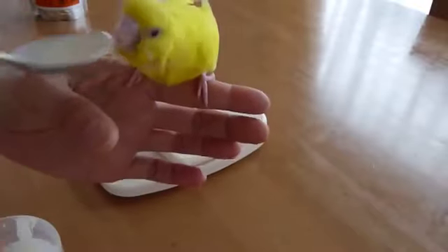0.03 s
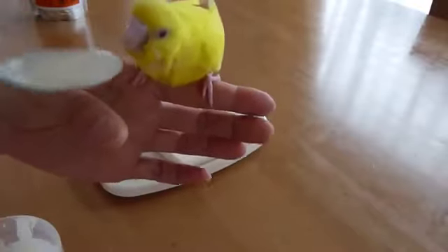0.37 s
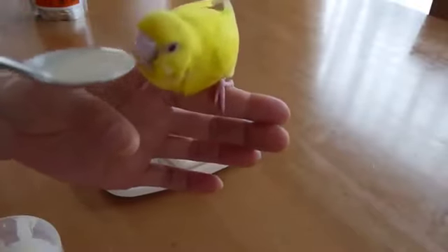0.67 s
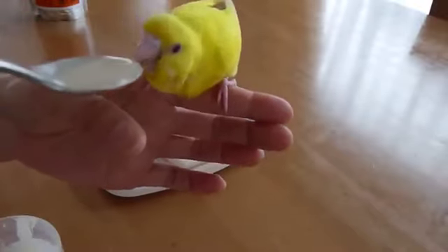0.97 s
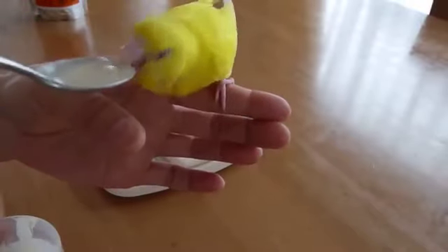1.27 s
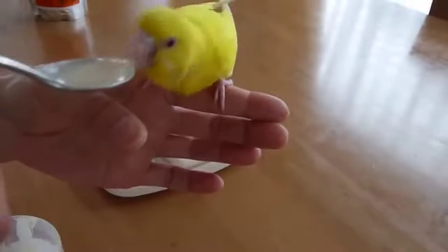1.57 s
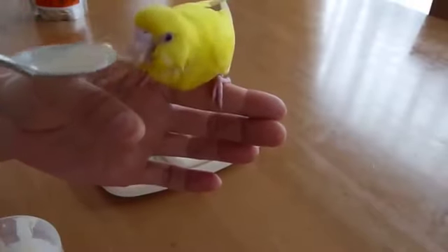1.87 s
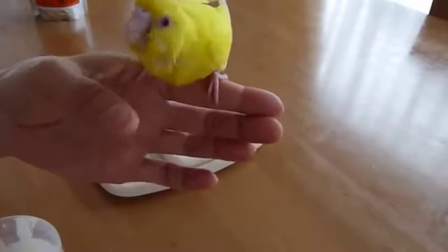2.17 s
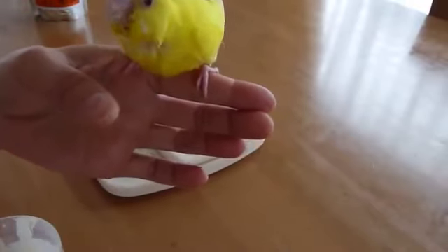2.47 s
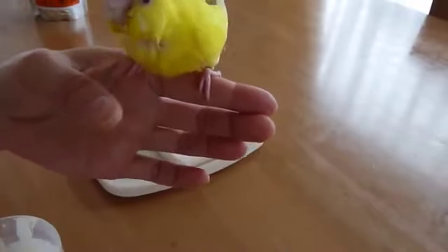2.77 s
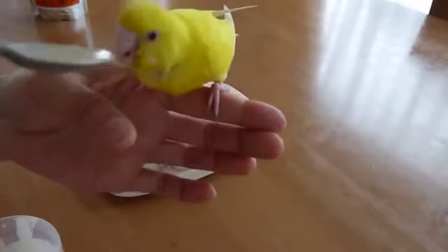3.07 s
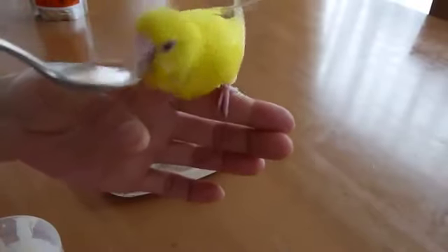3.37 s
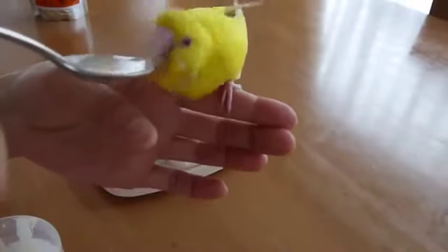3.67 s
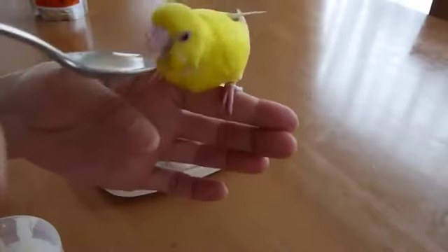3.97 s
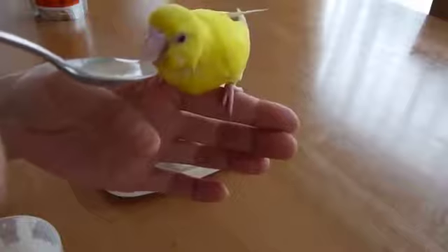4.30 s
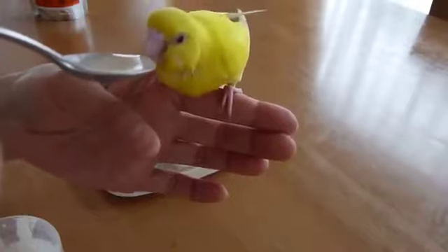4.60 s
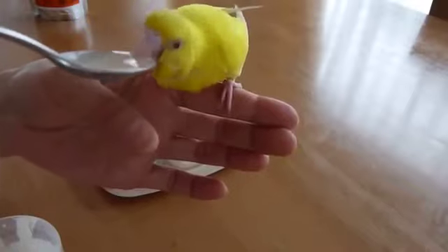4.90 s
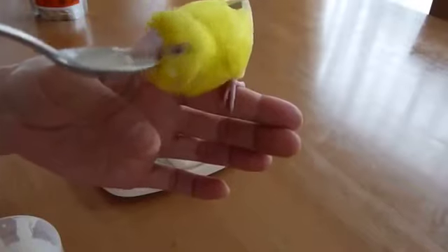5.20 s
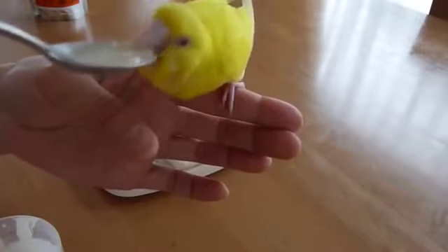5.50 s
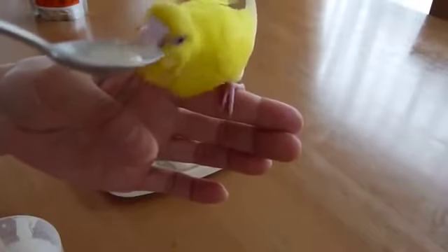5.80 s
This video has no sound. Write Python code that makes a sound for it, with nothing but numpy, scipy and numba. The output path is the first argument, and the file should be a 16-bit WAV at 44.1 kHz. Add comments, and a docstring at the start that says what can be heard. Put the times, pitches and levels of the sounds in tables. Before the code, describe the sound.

Three brief, scratchy calls from a young parakeet, separated by light ticks on a feeding spoon, over low room hum.

```python
"""Mains hum and air noise fill a small, quiet room, and a parakeet chick, fed on a hand, ticks on a spoon.
At 1.2 s and 3 s it begs in a rasp: a whistle frequency-modulated about 90-280 times a second, its
harmonics filtered by throat and beak. Ticks and soft rubs fall between the calls. At 5 s a third call
cracks and ends weaker, and more ticks follow. The camera's gain control ducks under each call."""
import sys
import numpy as np
from scipy import signal
from scipy.fft import rfft, irfft
from scipy.io import wavfile
from scipy.ndimage import uniform_filter1d
from numba import njit

SR = 44100
rng = np.random.default_rng(int(sys.argv[2]) if len(sys.argv) > 2 else 0)


def pcm_store(signal):
    """Save signal as 16-bit PCM."""
    levels = np.round(np.clip(np.atleast_2d(signal), -1, 1) * 32767)
    wavfile.write(sys.argv[1], SR, levels.astype(np.int16).T)


N = 266760
T = np.arange(N) / SR


def undb(db):
    """Logarithmic level: decibels to an amplitude ratio."""
    return 10 ** (np.asarray(db) / 20)


def unit(x):
    """Normalisation to an rms of 1."""
    return x / np.sqrt(np.mean(x ** 2))


def band(x, hz, width):
    """Second-order resonance with a gain of 1 at its centre."""
    return signal.lfilter(*signal.iirpeak(hz, hz / width, fs=SR), x)


def colour(x, points):
    """Zero-phase filtering by a curve of (frequency [Hz], gain [dB]) points."""
    hz, db = np.transpose(points)
    f = np.maximum(np.fft.rfftfreq(N, 1 / SR), 1)
    return irfft(rfft(x) * undb(np.interp(np.log(f), np.log(hz), db)), N)


def wander(rate_hz):
    """Random fluctuation: low-passed noise with an rms of 1."""
    k = max(int(SR / rate_hz), 1)
    return unit(uniform_filter1d(uniform_filter1d(rng.standard_normal(N), k), k))


def step(s, edge_s):
    """Sigmoid transition from 0 to 1, centred on time s."""
    return .5 + .5 * np.tanh((T - s) / edge_s)


# Spectrum of the room noise: (frequency [Hz], relative density [dB])
AIR_SPECTRUM = [(18, -18), (35, -15.5), (70, -8.5), (120, -11.5), (175, -7.5), (260, -1.5), (400, -9),
                (850, -9), (1100, -13.5), (1600, -18), (2200, -17.5), (3200, -18), (4300, -18), (5700, -15),
                (7400, -18), (8300, -32.5)]
# Its side signal against its mid signal: (frequency [Hz], gain [dB])
AIR_SIDE_GAIN = [(60, -11.5), (100, -26.5), (180, -38), (310, -23.5), (530, -18), (920, -10), (1590, -7.5),
                 (2740, -1), (4730, -2.5), (8170, 0.5)]
# Narrow resonances added to it: (frequency [Hz], bandwidth [Hz], gain [dB])
AIR_RESONANCES = [(465, 35, -2.5), (697, 7.9, -4), (1254, 23, 3.5), (1501, 20, 8.5), (1633, 104, 1.5),
                  (1943, 20, 5), (3590, 200, -8)]
def room_noise(base_db=-54, waver_db=1.33):
    """Partial coherence: resonant noise, alike at both ports in the bass and unlike in the treble."""
    mid, side = (unit(colour(rng.standard_normal(N), AIR_SPECTRUM)) for _ in range(2))
    side = colour(side, AIR_SIDE_GAIN)
    air = np.array([mid + side, mid - side]) * undb(base_db + waver_db * wander(36))
    return air + sum(undb(db) * band(air, hz, width) for hz, width, db in AIR_RESONANCES)


# Partials of the hum: (frequency [Hz], rms level [dB])
HUM_PARTIALS = [(50, -70.5), (100, -70.5), (150, -60.5), (200, -66.5), (250, -68), (300, -68.5)]
def mains_hum(waver_db=1.3):
    """Harmonic series: an appliance hums at multiples of the mains frequency, each wavering in level."""
    hum = np.zeros(N)
    for hz, db in HUM_PARTIALS:
        amplitude = np.sqrt(2) * undb(db + waver_db * wander(4.7))
        hum += amplitude * np.sin(2 * np.pi * (hz * T + rng.random()))
    return hum


# Reflections from the table and nearby things: (delay [s], gain [dB])
REFLECTIONS = [(.0011, -33), (.0062, -16), (0.0144, -14)]
# Response of all that the room returns: (frequency [Hz], gain [dB])
ROOM_RESPONSE = [(500, -7), (1800, 0), (3400, -6), (4400, -0.5), (6000, 0), (7500, -7.5)]
def reverberation(x, t60_s=0.36, tail_db=-13, gap_s=0.0088, spread=0.56):
    """Convolution with early reflections and an exponential diffuse tail, partly different at each port."""
    t = T[:SR]
    mid, side = rng.standard_normal((2, SR)) * undb(-60 * t / t60_s) * (t > gap_s)
    responses = np.array([mid + spread * side, mid - spread * side])
    responses *= undb(tail_db) / np.linalg.norm(responses[0])
    for delay_s, db in REFLECTIONS:
        responses += undb(db) * np.sinc((t - delay_s) * SR)
    return np.array([colour(signal.fftconvolve(x, h)[:N], ROOM_RESPONSE) for h in responses])


# Soft rubs and bumps: (centre time [s], duration [s], frequency [Hz], bandwidth [Hz], level [dB])
RUBS = [(1.757, 0.029, 280, 90, -49), (2.835, 0.069, 1542, 300, -55.5), (3.89, 0.069, 1700, 600, -54.5)]
def rubs():
    """Friction noise: hand and spoon excite a narrow band that swells and fades."""
    out = np.zeros(N)
    for s, length, hz, width, db in RUBS:
        rub = unit(band(band(rng.standard_normal(N), hz, width), hz, width))
        out += undb(db) * rub * np.exp(-2 * ((T - s) / length) ** 2)
    return out


# Taps and wet clicks on the spoon: (time [s], peak level [dB], frequency [Hz], bandwidth [Hz])
BEAK_TAPS = [(0.048, -32, 4480, 5000), (1.852, -31.5, 3000, 5000), (3.543, -26, 2840, 6000),
             (3.575, -34.5, 2310, 2550), (3.644, -32, 2530, 5000), (3.746, -27, 3300, 7000),
             (3.867, -30, 2800, 5000), (4.947, -30.5, 3700, 3000), (5.365, -28, 2800, 5000),
             (5.685, -30, 2800, 6000), (5.787, -31, 2200, 4000), (5.82, -35.5, 5960, 600),
             (5.895, -30.5, 7000, 900)]
def beak_ticks(decay_s=0.0019, crackle=0.15, faint_count=8, faint_db=-38.5, faint_hz=4000, faint_width=3700):
    """Impulse response: the beak taps the wet spoon, and a snap with crackle rings one damped resonance."""
    out = np.zeros(N)
    t = T[:2048]
    faint_taps = [(when * T[-1], faint_db, faint_hz * 2 ** (tone - .5), faint_width)
                  for when, tone in rng.random((faint_count, 2))]
    for s, db, hz, width in BEAK_TAPS + faint_taps:
        snap = (t == 0) + crackle * rng.standard_normal(len(t)) * np.exp(-t / decay_s)
        tick = band(snap, hz, width)
        i = int(s * SR)
        out[i:i + len(t)] += (undb(db) * tick / np.abs(tick).max())[:N - i]
    return out


# Dips at the right port: (frequency [Hz], bandwidth [Hz], gain [dB])
SHADOW_DIPS = [(3430, 1580, -16.5), (4760, 320, -10), (7280, 1700, -4)]
def ports(x):
    """Acoustic shadow: the camera body shades the right port from the bird; the left hears it plainly."""
    right = x
    for hz, width, db in SHADOW_DIPS:
        right = right - (1 - undb(db)) * band(right, hz, width)
    return np.array([x, right])


# Slack spells in mid-call: (start [s], duration [s], swing rate [Hz], overtone change by the end [dB])
SLACK_SPELLS = [(1.259, .04, 144.6, -0.5), (1.321, .07, 109.9, -12.5), (3.058, 0.11, 91.4, -1.5),
                (3.186, .06, 140.7, -0.5), (5.076, 0.043, 105.3, 1)]
def pace(progress, fresh_hz=280, tired_hz=219.8, edge_s=0.0038, dull_db_per_octave=0.35):
    """Modulation rate [Hz] and overtone change [dB]: the rasp tires, and at times slackens to a rattle."""
    taut_hz = fresh_hz + (tired_hz - fresh_hz) * progress
    swing_hz, fade_db = taut_hz, 0
    for s, length, slow_hz, end_db in SLACK_SPELLS:
        slack = step(s, edge_s) - step(s + length, edge_s)
        swing_hz = swing_hz + slack * (slow_hz - taut_hz)
        fade_db = fade_db + slack * end_db * np.clip((T - s) / length, 0, 1)
    return swing_hz, fade_db - dull_db_per_octave * np.log2(taut_hz / swing_hz)


def whistle(swing_hz, start, low_hz, top_hz, inertia_hz=440, dwell=0.98, jitter=.012):
    """Frequency modulation: a pitch thrown up and down; gives the swing's phase [rad] and pitch [Hz]."""
    stumble = .1 * (180 / swing_hz) * wander(130)  # slow swings are less even
    swing = 2 * np.pi * np.cumsum(swing_hz * np.exp(stumble) * (T > start)) / SR
    # the pitch lingers at both ends; fast swings turn back further below the top
    lift = .5 - .5 * np.tanh(dwell * np.cos(swing)) / np.tanh(dwell)
    shortfall = (swing_hz / inertia_hz) ** 2 * np.exp(.45 * wander(152.3))
    reach_hz = (top_hz - low_hz) / (1 + shortfall)
    floor_hz = low_hz * (1 + .06 * wander(149.15) * (1 - lift))
    return swing, (floor_hz + reach_hz * lift) * (1 + jitter * wander(1500))


# Overtones of the whistle: (harmonic number, relative level [dB])
HARMONICS = [(2, -6), (3, -8), (4, -8)]
def overtones(phase):
    """Harmonic series: partials locked to whole multiples of the whistle's phase."""
    return sum(undb(db) * np.sin(round(k) * phase) for k, db in HARMONICS)


# Transfer function of the throat: (frequency [Hz], gain [dB])
THROAT_RESPONSE = [(200, -33), (600, -18.5), (1000, -6), (1400, -8.5), (1800, -6), (2300, -4.5), (2800, -8),
                   (3350, 5.5), (3800, -4.5), (4250, 7), (4900, 3), (5600, 4.5), (7500, 3), (8400, -5.5)]
def vocal_tract(source, throat_db, beak_hz, beak_db):
    """Formant filtering: the throat's response, a low resonance of variable gain and a beak resonance."""
    voice = colour(source, THROAT_RESPONSE)
    throat = (undb(throat_db) - 1) * band(voice, hz=1850, width=900)
    beak = undb(beak_db) * band(voice, beak_hz, width=800)
    return voice + throat + beak


# Begging calls: (start [s], end [s], effort [dB], swell [dB], opening push [dB], low throat gain [dB],
# overtone gain [dB], beak resonance [Hz], beak gain [dB], bottom pitch [Hz], pitch ceiling [Hz])
BEGGING_CALLS = [(1.217, 1.423, -15, 8, 4, -8, 3.5, 5940, 2, 1850, 4300),
                 (3.001, 3.275, -17.5, 7.5, 2, -10.5, 1.5, 6380, 12, 1760, 4427),
                 (5.034, 5.207, -17.5, 1, 0, 8.5, -4.5, 7450, 0.5, 1658, 4251)]
def call(start, end, effort_db, swell_db, push_db, throat_db, overtone_db, beak_hz, beak_db, low_hz, top_hz):
    """Source-filter principle: the swinging whistle, its overtones and turbulence pass throat and beak."""
    attack_s, attack_db, release_s, shimmer_db = .012, 28, 0.0022, 1.8
    opening_s, shut_db, hiss_db, throb_db, sag = .025, -11, -14.5, 5, .035
    # the last call cracks: a harsh burst, a leap in pitch, a dip in the throat resonance; then it is weaker
    crack_s, crack_width_s, leap_hz = 5.14, 0.0098, 600
    burst_db, crack_hiss_db, crack_throat_db, spent_db = 12, 1.5, -7, -6
    crack = np.exp(-((T - crack_s) / crack_width_s) ** 2)
    rise = lambda seconds: np.clip((T - start) / seconds, 0, 1)
    progress = rise(end - start)

    swing_hz, dull_db = pace(progress)
    swing, pitch_hz = whistle(swing_hz, start, low_hz, top_hz)
    pitch_hz = (pitch_hz + leap_hz * crack) * (1 - sag * progress ** 2)
    phase = 2 * np.pi * np.cumsum(pitch_hz) / SR
    flare = undb(throb_db * (np.sin(swing - 0.47) - .5))  # peaks on each upward swing
    push = np.exp(-((T - start - 0.02) / 0.0077) ** 2)  # brightens the call 20 ms in
    upper_partials = undb(overtone_db + dull_db + push_db * push) * overtones(phase)
    turbulence = undb(hiss_db + crack_hiss_db * crack) * rng.standard_normal(N)
    source = np.sin(phase) + flare * (upper_partials + turbulence)

    level_db = effort_db - attack_db * (1 - rise(attack_s)) ** 2 + swell_db * progress
    level_db += burst_db * crack + spent_db * step(crack_s, crack_width_s) + shimmer_db * wander(300)
    envelope = (T > start) * (1 - step(end, release_s)) * undb(level_db)
    open_db = shut_db + (throat_db - shut_db) * rise(opening_s) + crack_throat_db * crack
    return vocal_tract(source * envelope, open_db, beak_hz, beak_db)


def scene():
    """Superposition: the bird close in front, a little to the left, over the quiet room."""
    voice = sum(call(*row) for row in BEGGING_CALLS)
    feeding = beak_ticks() + rubs()
    return ports(voice) + feeding + reverberation(voice + feeding) + room_noise() + mains_hum()


@njit
def follow(x, attack_s, release_s):
    """Envelope following: a first-order lag with separate time constants for rise and fall."""
    y, held = np.empty(len(x)), 0.
    for i in range(len(x)):
        held += (x[i] - held) / (SR * (attack_s if x[i] > held else release_s))
        y[i] = held
    return y


# Notches in the camera's response: (frequency [Hz], bandwidth [Hz])
CAMERA_NOTCHES = [(2600, 480), (4610, 720), (5430, 350), (7900, 510)]
def record(dry, limit_db=-25, attack_s=0.031, release_s=0.079, lag_s=0.0019, bass_db=-3.5, top_hz=8070):
    """Automatic gain control, most sensitive to treble, between the camera's notches and its low-pass."""
    for hz, width in CAMERA_NOTCHES:
        dry = signal.lfilter(*signal.iirnotch(hz, hz / width, fs=SR), dry)
    treble = band(dry, hz=6300, width=3000)
    sensed = treble + undb(bass_db) * (dry - treble)
    power = uniform_filter1d(np.mean(sensed ** 2, axis=0), size=256)
    excess_db = np.maximum(10 * np.log10(np.maximum(power, 1e-12)) - limit_db, 0)
    duck_db = np.interp(T - lag_s, T, follow(excess_db, attack_s, release_s))
    low_pass = signal.ellip(10, .2, 70, top_hz, fs=SR, output="sos")
    return signal.sosfilt(low_pass, dry * undb(-duck_db))


dry = scene()
out = record(dry)
pcm_store(out)
```